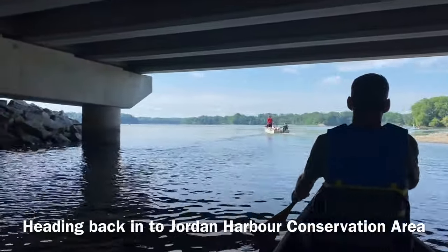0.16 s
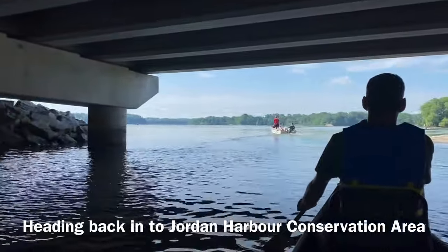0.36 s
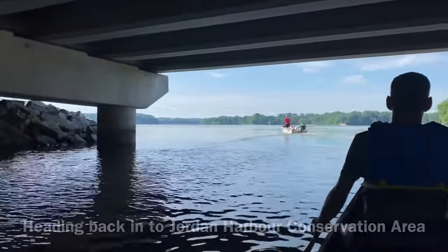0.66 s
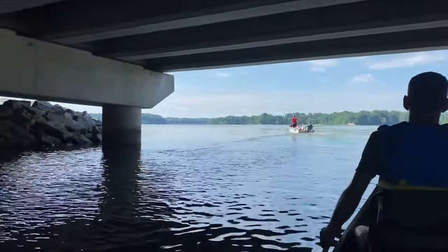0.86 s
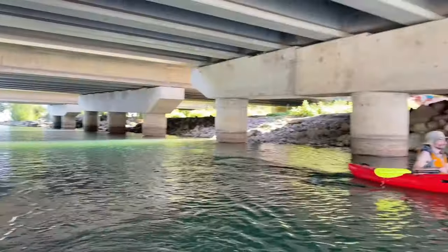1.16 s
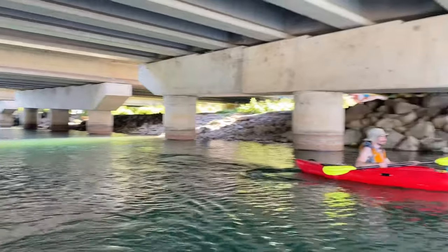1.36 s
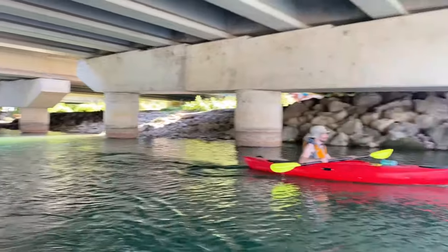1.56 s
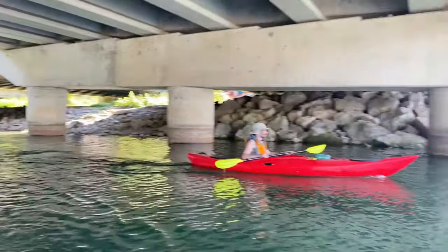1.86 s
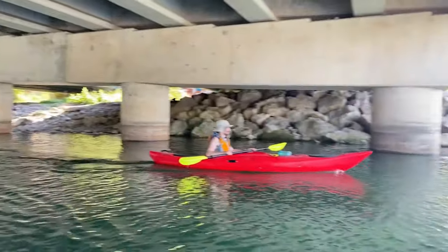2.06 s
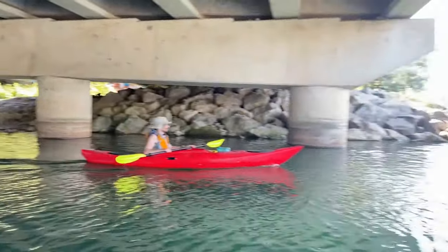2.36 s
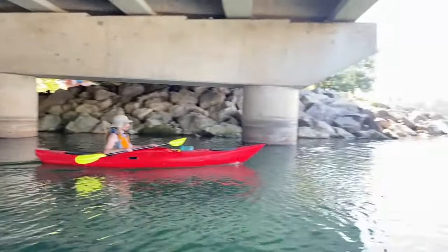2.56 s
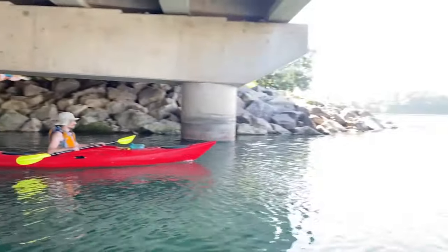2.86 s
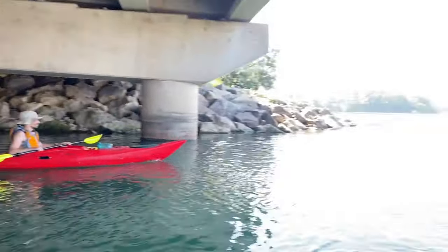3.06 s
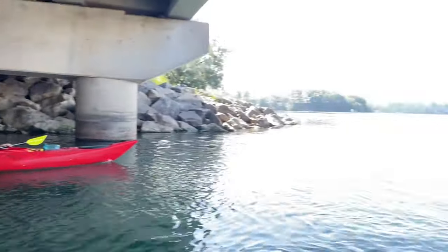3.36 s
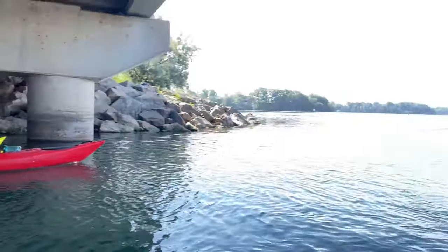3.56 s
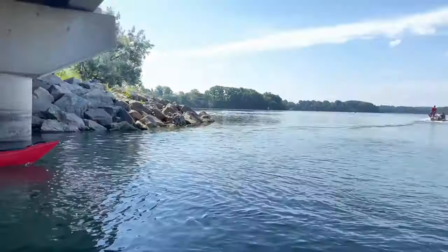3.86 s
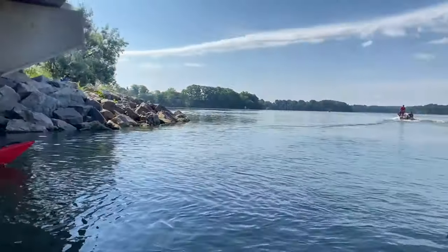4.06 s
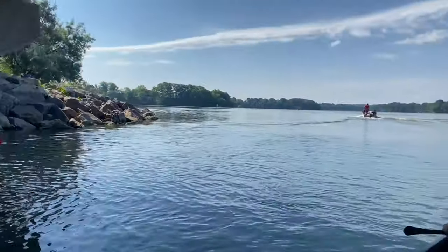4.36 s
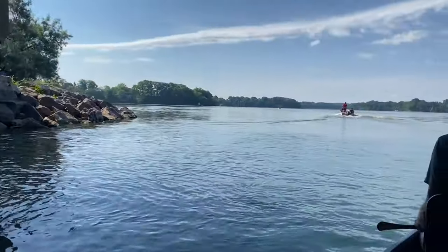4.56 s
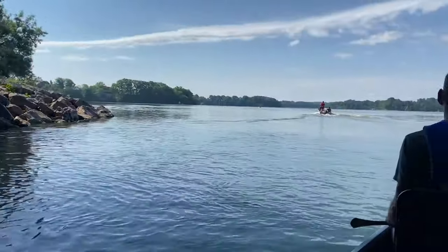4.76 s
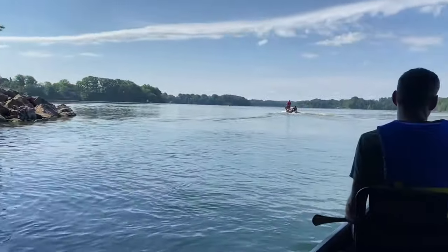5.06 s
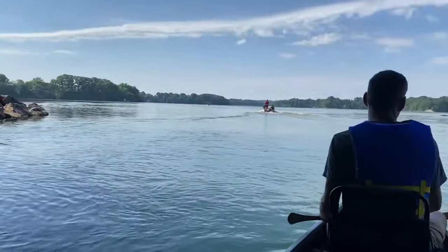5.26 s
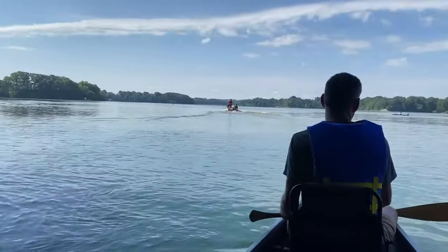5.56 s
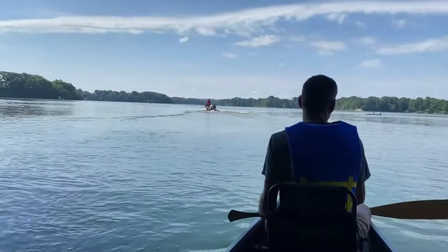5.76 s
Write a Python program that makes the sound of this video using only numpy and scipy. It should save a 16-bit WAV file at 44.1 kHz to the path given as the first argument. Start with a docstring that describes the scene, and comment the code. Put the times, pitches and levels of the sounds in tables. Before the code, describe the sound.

Tyres roar on a concrete highway bridge, heard from a canoe on the water below. After a brief dip, the sound turns to a deeper rumble as a heavy vehicle draws away and an idling boat motor drones. Drops and gear tick faintly, and a paddle knocks the hull several times with a short hollow ring. Soft rustles and a faint, thin bird whistle come near the end.

```python
"""First comes the roar of tyres round the edge of a concrete highway bridge, heard from a canoe below.
After a brief dip at 0.9 s a second scene begins: the deck rumbles, a heavy vehicle draws away and an
idling boat motor drones as it fires. Short low hums stand out of the traffic in both scenes.
Gear and drops tick, a paddle knocks the hull and makes it ring, and there are soft rustles.
Near the end a bird gives a thin whistle."""
import sys
import numpy as np
from scipy import signal
from scipy.fft import rfft, irfft, next_fast_len
from scipy.io import wavfile
from scipy.ndimage import uniform_filter1d

SR = 44100
rng = np.random.default_rng(int(sys.argv[2]) if len(sys.argv) > 2 else 0)


def to_wav(sig):
    """Store sig (one row per channel, or 1-D mono) as 16-bit WAV at the path in sys.argv[1].

    Samples outside -1..1 are clipped; the rate is SR.
    """
    pcm = np.clip(np.atleast_2d(sig), -1, 1) * 32767
    pcm = np.round(pcm).astype(np.int16)
    wavfile.write(sys.argv[1], SR, pcm.T)  # frames by channels


N = 261513

# the four zones of traffic sound, one row each for rumble, boom, roar and hiss: (from [Hz], to [Hz])
TRAFFIC_ZONES = [(50, 200), (250, 500), (700, 2000), (4500, 11000)]
# traffic in the first scene: (time [s], deck rumble [dB], hollow boom [dB], tyre roar [dB], hiss [dB])
EDGE_LEVELS = [(0, -38.5, -47, -40.5, -64.5), (.88, -38.5, -47, -42.3, -68)]
# tone colour of the traffic in the first scene: (frequency [Hz], relative level [dB])
EDGE_COLOUR = [(20, -45), (35, -15), (55, -14), (72, -5.5), (100, -9.5), (140, -13), (250, -16.5),
               (400, -21), (1000, -21.5), (2000, -36), (4000, -54), (7000, -64.5), (12000, -71.5),
               (15700, -80)]
# tone colour of the traffic in the second scene: (frequency [Hz], relative level [dB])
DECK_COLOUR = [(20, -18.5), (38, -1.5), (75, -4), (115, -0.5), (150, 0), (200, -8), (300, -13.5),
               (700, -17), (1500, -31.5), (3000, -49), (5000, -60), (8000, -66), (10800, -75),
               (11150, -78.5)]
# short hums: (start [s], end [s], first pitch [Hz], last pitch [Hz], level [dB])
HUMS = [(0, 0.15, 70.7, 69.6, -36.5), (0.124, 0.366, 71.8, 69, -34), (0.36, 0.595, 57.9, 57.7, -37.5),
        (1.153, 1.613, 113.2, 111.2, -38), (1.656, 2.01, 117.5, 119.3, -37), (0.916, 0.99, 375.4, 354, -40),
        (1.68, 1.774, 470, 463, -40.5), (2.894, 3.037, 356, 357, -41.5)]
# the motor's lowest tone, one cycle per firing: (time [s], level [dB])
FIRING_LEVEL = [(0.93, -36), (1.05, -23.5), (1.27, -38), (1.4, -26), (1.72, -24), (1.82, -43), (2.2, -36),
                (2.38, -36), (2.54, -44), (2.81, -30), (3.27, -34), (3.39, -27), (3.54, -33), (3.74, -27),
                (3.84, -33.5), (3.96, -28), (4.8, -29.5), (5.03, -37), (5.12, -34), (5.2, -38), (5.25, -36),
                (5.31, -47), (5.39, -31.5), (5.46, -36), (5.51, -29), (5.585, -35), (5.63, -33),
                (5.7, -31.5), (5.93, -34)]
# how the motor runs: (time [s], firing rate [Hz], base level of the overtones [dB])
MOTOR_RUN = [(.93, 46.6, -26.5), (1.9, 48.07, -31.5), (4.2, 48.63, -36.5), (5.6, 49.45, -34.5)]
# motor overtones: (multiple of the firing rate, level against the base at 5 s [dB], drift [dB/s])
MOTOR_OVERTONES = [(2, -15, -0.5), (3, -12, -1.5), (4, -12.5, 1.5), (5, -22, 2.5), (6, -22.5, -0.5),
                   (7, -31, -3.5), (9, -27.5, 1)]
# ticks of gear and drops: (time [s], peak level [dB], centre [Hz], width [octaves])
TICKS = [(.947, -56, 5400, .25), (1.082, -49, 4000, .3), (1.084, -48, 6200, 0.56), (1.109, -55, 4300, .35),
         (1.235, -49.5, 5030, 0.64), (1.258, -52, 5500, 0.67), (1.353, -51, 6200, 0.92),
         (1.632, -42.5, 7600, 0.56), (1.789, -52, 2700, .4), (2.05, -55, 2800, .5), (2.16, -57, 8240, 0.76),
         (2.29, -60, 7500, 0.41), (2.45, -58, 4780, 0.25), (2.64, -60, 7000, .7), (2.793, -56, 4900, .3),
         (3.125, -68, 9500, .4), (3.183, -51, 4400, 0.6), (3.184, -62, 8500, .5), (3.205, -60, 5500, 1),
         (3.285, -58, 4500, .8), (3.465, -57, 4300, .4), (3.594, -54, 7200, 1.1), (3.655, -57, 5000, 1),
         (3.692, -56, 4500, .8), (3.775, -47, 4400, .2), (4.079, -50.5, 5960, 0.58), (4.081, -67, 9800, .1),
         (4.196, -54, 5500, 1), (4.202, -59, 10000, .3), (4.215, -53, 4300, 0.13), (4.439, -66, 8800, .6),
         (4.633, -55, 7400, 0.67), (4.657, -50, 4470, 0.56), (4.696, -51, 4500, 1), (5.355, -70, 9800, .3),
         (5.77, -67, 8900, .3)]
# paddle blows: (time [s], level [dB], centre [Hz], narrowness [dB/octave^2],
# average time for the ring to fall 60 dB [s], contact time [s])
PADDLE_BLOWS = [(2.8163, -23, 860, 7, 0.036, 0.016), (2.8163, -35.5, 2200, 26, 0.016, 0.006),
                (2.821, -26, 215, 17, 0.059, 0.014), (2.832, -40.5, 3000, 1.5, 0.013, 0.0034),
                (3.774, -40.5, 1790, 13, 0.02, 0.012), (3.776, -24.5, 940, 34, 0.03, 0.004),
                (3.783, -31, 345, 23, 0.073, 0.0057), (3.792, -25.5, 527, 14, 0.053, 0.053),
                (4.194, -39.5, 1750, 14, 0.021, 0.014), (4.205, -46, 2400, 4, 0.02, 0.006),
                (4.214, -24.5, 165, 7, 0.054, 0.0087), (4.215, -33, 595, 9, 0.03, 0.0049),
                (4.444, -51, 2090, 43, 0.037, .008), (4.656, -40, 2620, 11, 0.012, 0.034),
                (4.656, -26.5, 680, 3, 0.025, 0.019), (4.666, -23.5, 246, 12, 0.12, 0.013),
                (4.678, -28, 600, 8, 0.024, 0.014), (4.696, -38, 1400, 4, 0.027, 0.0047),
                (4.697, -23, 258, 8.5, 0.066, 0.022)]
# the tones the hull rings at: (pitch [Hz], relative level [dB], ring length [relative])
HULL_TONES = [(165, 0, .09), (210, 0, .09), (250, -1, .09), (300, -3, .08), (370, -2, .08), (480, -2, .07),
              (600, 0, .07), (730, -2, .06), (890, 0, .06), (1050, -2, .05), (1350, -3, .05),
              (1720, -4, .05), (2060, -5, .04), (2430, -7, .04), (2800, -7, .04), (3500, -14, .03),
              (4400, -14, .03)]
# scratchy swells: (start [s], end [s], upper frequency [Hz], level [dB])
RUSTLES = [(3.58, 3.818, 8160, -67.5), (4.953, 5.938, 3950, -66), (5.82, 5.902, 7650, -67.5)]
# two bird phrases, each a list of (time [s], pitch [Hz], level [dB])
BIRD_PHRASES = [
    [(5.33, 7060, -88), (5.362, 7570, -81), (5.378, 7450, -78), (5.415, 7510, -79), (5.46, 7300, -84)],
    [(5.5, 7620, -83), (5.528, 7830, -78), (5.548, 7400, -80), (5.567, 7680, -79), (5.592, 7520, -77),
     (5.605, 7880, -78), (5.665, 7760, -83), (5.70, 7300, -82), (5.735, 7120, -84), (5.77, 6760, -85)],
]

# traffic in the second scene; each group of four is rumble, boom, roar, hiss
PASSING_S = 1.396  # the moment at which STEADY_DB and HEAVY_DB hold
STEADY_DB, STEADY_DRIFT_DB_PER_S = (-35, -45.5, -47, -70.5), (-1.18, 0.26, -0.33, -0.58)
HEAVY_DB = (-31, -38, -51, -68)
EARLY_FADE_DB_PER_S, LATE_FADE_DB_PER_S = 5, (4.4, 10.1, 1.27, 20)  # heavy vehicle, before and after
FADE_OUT_S, FADE_IN_S = (0.882, 0.914), (0.906, 0.944)  # first scene out, second scene in


def undb(db):
    """Turns decibels into a factor to multiply by."""
    return 10 ** (np.asarray(db) / 20)


def columns(table):
    """Draws each column after the time as a curve with one value per sample."""
    times, *cols = np.transpose(table)
    return [np.interp(np.arange(N) / SR, times, col) for col in cols]


def ramp(start, end):
    """Climbs from 0 at the start to 1 at the end."""
    return np.clip((np.arange(N) / SR - start) / (end - start), 0, 1)


def swell(start, end):
    """A smooth rise and fall."""
    return np.sqrt(np.sin(np.pi * ramp(start, end)).clip(0))


def wobble(rate):
    """A smooth random curve, about 1 in size, that heads for a new value `rate` times a second."""
    hold = int(SR / rate)
    steps = np.repeat(rng.standard_normal(N // hold + 1), hold)
    return 1.282 * uniform_filter1d(uniform_filter1d(steps, hold), hold)[:N]


def bandpass(sound, low_hz, high_hz, order=2):
    """Keeps the part of a sound between two frequencies."""
    return signal.sosfilt(signal.butter(order, [low_hz, high_hz], "band", fs=SR, output="sos"), sound)


def add(out, sound, start):
    """Mixes a short sound in at a time in seconds."""
    i = int(start * SR)
    out[i:i + len(sound)] += sound[:len(out) - i]


def traffic(levels_db, colour, shared_db, flicker_db, grit_db):
    """Many vehicles blur into bands of noise: neighbours swell together, and the treble is gritty."""
    size = next_fast_len(N)
    hz = np.maximum(np.arange(size // 2 + 1) * SR / size, 1)
    colour_hz, colour_db = np.transpose(colour)
    shape = undb(np.interp(np.log(hz), np.log(colour_hz), colour_db, right=-150))
    # scale each zone so that its own curve sets its level
    zone_db = [level - 10 * np.log10(2 * np.sum(shape[(hz > low) & (hz < high)] ** 2) / size)
               for level, (low, high) in zip(levels_db, TRAFFIC_ZONES)]
    zones = np.arange(len(TRAFFIC_ZONES))
    out, shared, grit = 0, wobble(24), wobble(120)
    for octave in np.arange(4, 14.6, .5):
        window = np.cos(np.pi * np.clip(np.log2(hz) - octave, -.5, .5))
        band = irfft(rfft(rng.standard_normal(size)) * shape * window, size)[:N]
        place = np.interp(octave, np.log2(TRAFFIC_ZONES).ravel(), zones.repeat(2))  # 0 rumble, 3 hiss
        zone_weights = np.clip(1 - abs(place - zones), 0, 1)
        shared = .8 * shared + .6 * wobble(12)  # partly follows the band below
        rough_db = place / 3 * (shared_db * shared + grit_db * grit)
        out += undb(zone_weights @ zone_db + rough_db + flicker_db * wobble(3)) * band
    return out


def hums():
    """Single low tones, perhaps passing engines, stand out of the rumble for a moment."""
    out = 0
    for start, end, first_hz, last_hz, db in HUMS:
        hz = first_hz + (last_hz - first_hz) * ramp(start, end)
        strength = np.sqrt(2) * undb(db + 1.5 * wobble(23.55)) * swell(start, end)
        out += strength * np.sin(2 * np.pi * np.cumsum(hz) / SR)
    return out


def deck_levels():
    """Each zone's level in dB: steady traffic drifts as the canoe glides, and a heavy vehicle fades."""
    since = np.arange(N) / SR - PASSING_S
    levels = []
    for steady, drift, heavy, fade in zip(STEADY_DB, STEADY_DRIFT_DB_PER_S, HEAVY_DB, LATE_FADE_DB_PER_S):
        steady_power = undb(steady + drift * since) ** 2
        heavy_power = undb(heavy - np.where(since > 0, fade, EARLY_FADE_DB_PER_S) * since) ** 2
        levels.append(10 * np.log10(steady_power + heavy_power))
    return levels


def boat_motor():
    """Firing makes a drone. The speed wanders a little, and moving echoes make each overtone waver."""
    t = np.arange(N) / SR
    firing_hz, base_db = columns(MOTOR_RUN)
    phase = 2 * np.pi * np.cumsum(firing_hz * (1 + 0.00726 * wobble(10))) / SR
    overtones = 0
    for multiple, db, drift in MOTOR_OVERTONES:
        strength = undb(base_db + db + drift * (t - 5) + 3.2 * wobble(3.7))
        overtones += strength * np.sin(multiple * phase + rng.uniform(0, 2 * np.pi))
    firing_db = columns(FIRING_LEVEL)[0] + 0.7 * wobble(6.43) + 0.5 * wobble(27)
    return np.sqrt(2) * (undb(firing_db) * np.sin(phase) + overtones)


def crackles(per_second=24, fade_s=0.011):
    """Faint stray crackles: tiny bursts of noise at random moments."""
    kicks = (rng.random(N) < per_second / SR) * rng.standard_normal(N)
    bursts = signal.lfilter([1], [1, -np.exp(-np.log(1000) / (fade_s * SR))], kicks)
    return undb(-69) * bandpass(bursts * rng.standard_normal(N), 2500, 9000)


def ticks(rise_s=0.002, fade_s=0.032):
    """Gear and drops tick: each is a short burst of noise around one pitch."""
    out, t = np.zeros(N), np.arange(int(.1 * SR)) / SR
    envelope = np.minimum(t / rise_s, 1) * np.exp(-np.log(1000) * t / fade_s)
    for start, db, hz, octaves in TICKS:
        reach = 2 ** (octaves / 2)
        tick = envelope * bandpass(rng.standard_normal(len(t)), hz / reach, hz * reach)
        add(out, undb(db) * tick / np.max(abs(tick)), start)
    return out


def paddle_knocks():
    """Each blow is a short, rough push that rings the hull tones near its own centre pitch."""
    out, t = np.zeros(N), np.arange(int(.3 * SR)) / SR
    hz, tone_db, ring_length = np.transpose(HULL_TONES)[:, :, None]
    for start, db, centre_hz, narrowness, ring_s, contact_s in PADDLE_BLOWS:
        decay = np.exp(-np.log(1000) * t / (ring_s * ring_length / ring_length.mean()))
        strength = undb(tone_db - narrowness * np.log2(hz / centre_hz) ** 2)
        tones = strength * decay * np.sin(2 * np.pi * hz * t)
        push = rng.standard_normal(len(t)) * np.exp(-t / contact_s)
        push[0] += .8 * np.sqrt(contact_s * SR)  # the first touch
        # wood on plastic gives a little, so the push has no sharp edge
        reach = 2 ** np.sqrt(6 / narrowness)
        push = bandpass(push, centre_hz / reach, centre_hz * min(reach, 2.1), order=4)
        ring = signal.fftconvolve(push, tones.sum(axis=0))[:len(t)]
        blow = ring / np.max(abs(ring)) + push / np.max(abs(push))  # the contact is heard directly too
        loudest_power = np.max(uniform_filter1d(blow ** 2, size=300))
        add(out, undb(db) * blow / np.sqrt(2 * loudest_power), start)
    return out


def rustles():
    """Soft, scratchy swells of noise, perhaps cloth or gear."""
    out = 0
    for start, end, hz, db in RUSTLES:
        noise = bandpass(rng.standard_normal(N), hz / 2.4, hz * 1.03)
        out += undb(db + 2.2 * wobble(90)) * swell(start, end) * noise / noise.std()
    return out


def bird(fade_s=.015):
    """A thin, almost pure whistle that glides in pitch and wobbles in strength."""
    out = 0
    for phrase in BIRD_PHRASES:
        hz, db = columns(phrase)
        start, end = phrase[0][0], phrase[-1][0]
        gate = ramp(start - fade_s, start) * (1 - ramp(end, end + fade_s))
        phase = 2 * np.pi * np.cumsum(hz * (1 + .003 * wobble(120))) / SR
        out += np.sqrt(2) * undb(db + 2.2 * wobble(60)) * gate * np.sin(phase)
    return out


def scene():
    """The roar at the bridge's edge gives way to the deck, motor and canoe; hums and bird go on top."""
    edge = traffic(columns(EDGE_LEVELS), EDGE_COLOUR, shared_db=.6, flicker_db=.3, grit_db=.6)
    deck = traffic(deck_levels(), DECK_COLOUR, shared_db=1, flicker_db=.8, grit_db=.6)
    motor = boat_motor()
    treble_limit = signal.ellip(8, .5, 60, 11300, fs=SR, output="sos")
    canoe = signal.sosfilt(treble_limit, paddle_knocks() + ticks() + crackles() + rustles())
    first = edge * (1 - ramp(*FADE_OUT_S))
    second = (deck + motor + canoe) * ramp(*FADE_IN_S)
    return (first + second + hums() + bird())[None]


def record(dry, top_hz=15700):
    """A phone loses the very highest treble."""
    return signal.sosfilt(signal.ellip(8, .2, 70, top_hz, fs=SR, output="sos"), dry)


dry = scene()
out = record(dry)
to_wav(out)
```